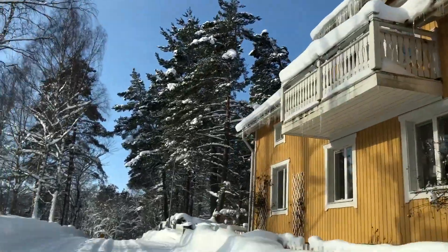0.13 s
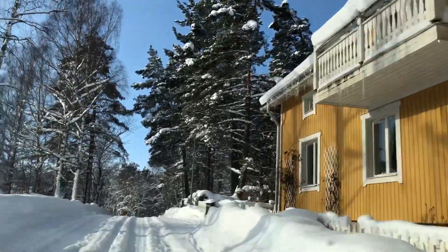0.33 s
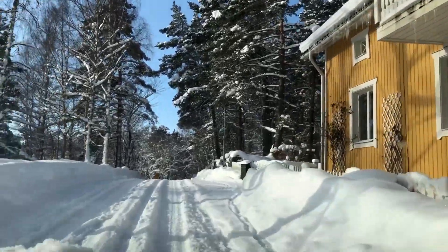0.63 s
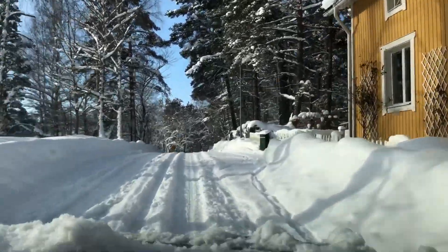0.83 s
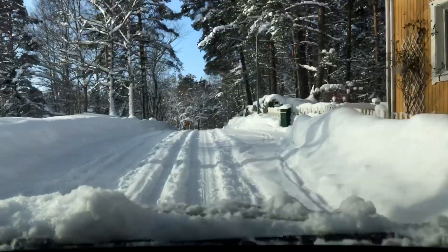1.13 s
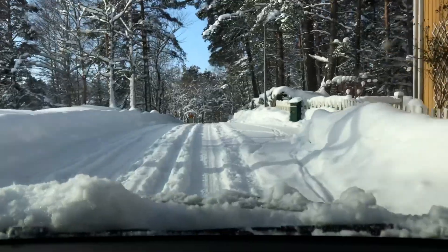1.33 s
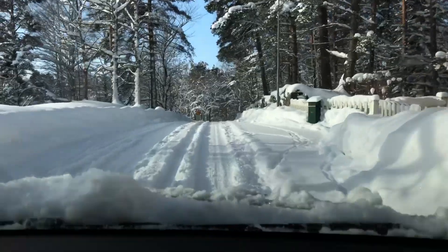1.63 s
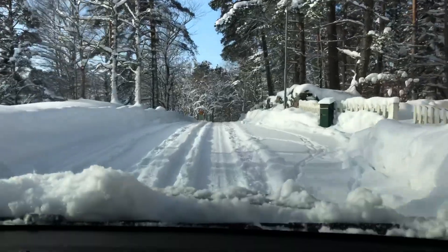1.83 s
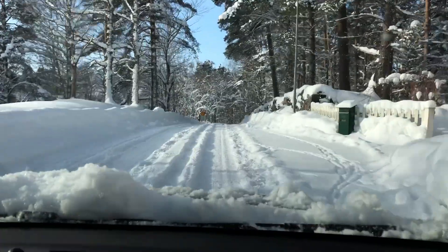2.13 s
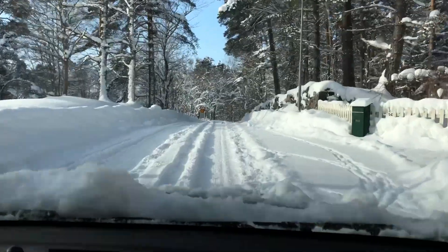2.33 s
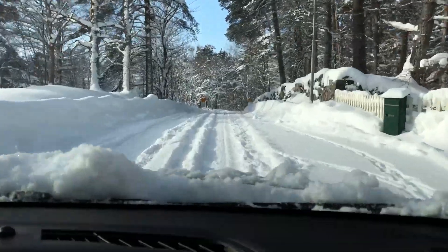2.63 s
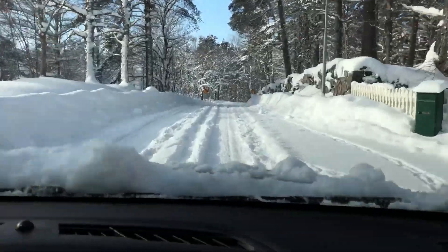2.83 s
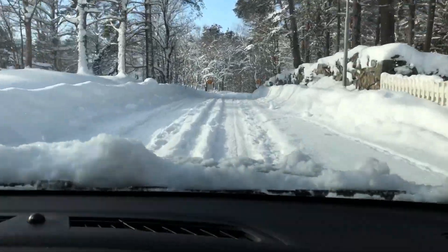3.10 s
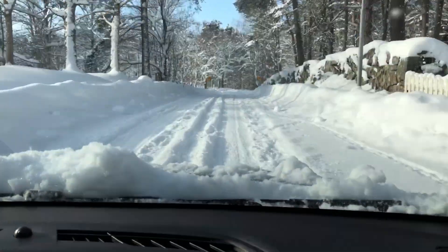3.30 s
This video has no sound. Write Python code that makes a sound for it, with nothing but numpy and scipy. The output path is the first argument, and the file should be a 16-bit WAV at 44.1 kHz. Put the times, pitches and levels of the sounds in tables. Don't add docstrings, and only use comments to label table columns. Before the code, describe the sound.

Inside a closed car cabin, a low engine hum with light knocking slows, holds and slightly picks up, over steady rumble; a close coat swish comes early, a metallic clink and faint squeaks late.

```python
import sys
import numpy as np
from scipy import signal
from scipy.io import wavfile
from scipy.ndimage import uniform_filter1d

SR = 44100
rng = np.random.default_rng(int(sys.argv[2]) if len(sys.argv) > 2 else 0)


def digitize_waveform(pressure):
    field = np.atleast_2d(pressure).T
    bounded = np.clip(field, -1, 1)
    quanta = np.round(bounded * 32767).astype(np.int16)
    wavfile.write(sys.argv[1], SR, quanta)


def voltage_ratio(decibels):
    exponent = np.asarray(decibels, float) / 20
    return 10 ** exponent


N = 152586
T = np.arange(N) / SR


def evened(x):
    return x / np.sqrt(np.mean(x ** 2) + 1e-20)


def resonate(x, hz, width):
    r = np.exp(-np.pi * width / SR)
    pole = r * np.exp(2j * np.pi * hz / SR)
    return 2 * signal.lfilter([1 - r], [1, -pole], x.astype(complex)).real


def drift(top_hz):
    t = T[::32]
    wander = np.zeros(len(t))
    for hz in np.geomspace(top_hz / 20, top_hz, num=20):
        wander += np.sin(2 * np.pi * (hz * t + rng.random())) / np.sqrt(hz)
    return evened(np.interp(T, t, wander))


def noise(points, patchy_db, size):
    hz = np.fft.rfftfreq(size, 1 / SR)
    f, db = np.transpose(points)
    real, imaginary, patches = rng.standard_normal((4 * N // size + 6, len(hz), 3)).T
    patches = uniform_filter1d(patches, size=5, axis=0)
    patches = evened(uniform_filter1d(patches, size=6, axis=1))
    octave = np.log2(hz + 1)
    colour = np.interp(octave, np.log2(f), db)
    colour -= 12 * np.maximum(np.log2(f[0]) - octave, 0)
    colour -= 24 * np.maximum(octave - np.log2(f[-1]), 0)
    spectra = (real + 1j * imaginary) * voltage_ratio(colour[:, None] + patchy_db * patches)
    return evened(signal.istft(spectra, nperseg=size, noverlap=3 * size // 4)[1][:N])


# time in seconds, rate in four-stroke cycles per second (four firings a cycle).
CYCLE_RATE = [
    (0.0, 15.119),
    (0.5, 15.495),
    (0.75, 14.818),
    (1.05, 13.974),
    (1.45, 13.463),
    (2.0, 13.443),
    (2.6, 13.471),
    (3.0, 14.003),
    (3.46, 14.168),
]


def crank():
    slow, fast = 13.5, 15.3
    speed = np.interp(T, *np.transpose(CYCLE_RATE))
    return np.cumsum(speed) / SR, np.clip((speed - slow) / (fast - slow), 0, 1)


# multiple of the cycle rate, level in dB when slow, level in dB when fast,
# lead in turns when slow, lead in turns when fast, wobble in dB.
ORDERS = [(4, -34, -33.5, 0, -.42, 1.5), (8, -35, -48, .24, .2, 1), (12, -60, -44.5, .15, .1, 2),
          (3, -46, -60, .62, .1, 2), (10, -50, -50, .1, .3, 3), (13, -51, -52, .4, .3, 2),
          (16, -51, -57.5, .24, .11, 3), (36, -50.5, -64, .7, .67, 1.6), (48, -64, -60.5, .35, .2, 3.5),
          (32, -55, -56, .64, .56, 2.5)]
# time in seconds, extra firing boom in dB.
LOAD_BUMPS = [(0, -13), (.2, 1.5), (.4, 0.5), (.6, -3), (.85, 4), (1.2, -1), (1.4, 2.5), (1.6, 3),
              (1.85, 0.5), (2.0, 3), (2.15, 0), (2.3, -3.5), (2.7, -1.5), (2.88, -4.5), (3.05, 6.5),
              (3.25, -6), (3.46, 7)]


def engine_boom():
    cycle, fast = crank()
    load_db = np.interp(T, *np.transpose(LOAD_BUMPS))
    out = np.zeros(N)
    for order, slow_db, fast_db, slow_lead, fast_lead, wobble_db in ORDERS:
        level_db = slow_db + (fast_db - slow_db) * fast + wobble_db * drift(5.92)
        if order == 4:
            level_db = level_db + load_db
        turns = order * cycle + slow_lead + (fast_lead - slow_lead) * fast
        out += np.sqrt(2) * voltage_ratio(level_db) * np.cos(2 * np.pi * turns)
    return out


# frequency in Hz, width in Hz, level in dB when slow,
# level in dB when fast, lead in seconds.
BLOCK_MODES = [(2152, 62, -52.7, -48.7, .0055), (2118, 40, -62, -58, .0048), (2250, 80, -67, -62, .001),
               (2870, 150, -67.5, -59.5, .009), (1630, 110, -65, -64, .005), (486, 30, -55, -55, -.004)]
# first, second, third and fourth cylinder in dB.
CYLINDER_DB = [(0, -20, -9.5, -13), (0, -20, -9.5, -13), (0, -10, -8, -8), (0, -14, -3, -7),
               (-1.5, -2.5, 0, -1.5), (-6, 0, -5, -3)]
# time in seconds, then first to fourth cylinder in dB.
KNOCK_SHIFT = [(0, -1.5, 2, 0, -2), (.4, 2, 13, 3.5, 7.5), (.7, -0.5, 9, 1.5, 4.5), (1.4, 3.5, 6, 1, 8),
               (1.8, 2, -2, 3, -7), (2.4, 1, 6, -5.5, 1), (2.7, -1, 3, 3, 0), (2.85, -0.5, 13, 5, 5),
               (3.05, -1, -5, 5.5, -4), (3.46, 1, 4, 0.5, 4)]


def engine_knock():
    burst_s, spread_db, rattle_spread_db, rough_share, sag_db_per_s = .002, .7, 1.5, .05, -.7
    cycle, fast = crank()
    at = np.searchsorted(4 * cycle, np.arange(int(4 * cycle[-1]) + 1))
    count = len(at)
    strength_chance, time_chance = rng.standard_normal((2, count))
    shift_s, *shifts = np.transpose(KNOCK_SHIFT)
    shift_db = np.array([np.interp(T[at[k]], shift_s, shifts[k % len(shifts)]) for k in range(count)])
    t = np.arange(int(5 * burst_s * SR)) / SR
    burst = t / burst_s * np.exp(-t / burst_s)
    out = np.zeros(N)
    for (hz, width, slow_db, fast_db, lead), pattern in zip(BLOCK_MODES, CYLINDER_DB):
        if abs(hz - BLOCK_MODES[0][0]) < width:
            extra_db = shift_db
        else:
            extra_db = rattle_spread_db * rng.standard_normal(count)
        jitter = (time_chance * 15).astype(int)
        place = np.clip(at - round(lead * SR) + jitter, 0, N - 1)
        hits = np.zeros(N)
        hits[place] = voltage_ratio(np.resize(pattern, count) + spread_db * strength_chance + extra_db)
        tone_bursts = signal.oaconvolve(hits, burst * np.cos(2 * np.pi * hz * t))[:N]
        noise_bursts = signal.oaconvolve(hits, burst)[:N] * rng.standard_normal(N)
        clean = resonate(tone_bursts, hz, width)
        rough = resonate(resonate(noise_bursts, hz, width), hz, 4 * width)
        ring = (1 - rough_share) * evened(clean) + rough_share * evened(rough)
        level_db = slow_db + (fast_db - slow_db) * fast + sag_db_per_s * (T + 1.5)
        out += voltage_ratio(level_db) * evened(ring)
    return out


# frequency in Hz, level in dB per Hz.
FLOOR_COLOUR = [(20, -48), (30, -21), (42, 3.5), (56, -5.5), (72, 0), (140, -1), (200, -8), (300, -16)]


def road_rumble():
    return voltage_ratio(-32.5 + .5 * drift(3.24)) * noise(FLOOR_COLOUR, patchy_db=1.33, size=4096)


# frequency in Hz, level in dB per Hz.
ROAR_COLOUR = [(200, -1), (400, -3.5), (700, -8.5), (1000, -17), (1700, -19), (2050, -23.5), (3500, -30),
               (7000, -44.5)]


def fan_and_tyre_roar():
    return voltage_ratio(-40.5 + .3 * drift(3.0)) * noise(ROAR_COLOUR, patchy_db=.9, size=1024)


# frequency in Hz, width in Hz, level in dB when slow, level in dB when fast.
PANEL_MODES = [(490, 22, -55, -55), (644, 30, -56, -55), (718, 30, -56, -56), (180, 16, -48, -42),
               (150, 14, -46, -41), (136, 22, -43, -43), (216, 14, -48, -50), (4300, 150, -76, -76),
               (2150, 70, -67, -63)]


def panel_hum():
    fast = crank()[1]
    out = np.zeros(N)
    for hz, width, slow_db, fast_db in PANEL_MODES:
        hum = resonate(resonate(rng.standard_normal(N), hz, width), hz, 2 * width)
        out += voltage_ratio(slow_db + (fast_db - slow_db) * fast) * evened(hum)
    return out


# frequency in Hz, level in dB per Hz.
CLOTH_COLOUR = [(2000, -6), (5000, 0), (9000, -1.5), (13000, -1), (15000, 2.5), (15750, 5)]
# peak in seconds, rise in seconds, fall in seconds, level in dB.
STROKES = [(.0, .05, .14, -62), (.6, .2, .2, -67.5), (.94, .08, .075, -54.5), (.83, .06, .05, -63),
           (1.08, .07, .17, -61.5), (1.34, .05, .05, -63), (1.52, .05, .07, -67), (1.78, .04, .04, -72),
           (2.97, .04, .15, -67.5), (3.13, .06, .06, -73), (3.3, .06, .13, -63.5), (2.0, 1.2, 1.5, -72)]


def coat():
    power = np.zeros(N)
    for peak, rise, fall, db in STROKES:
        power += voltage_ratio(2 * db) * np.exp(-((T - peak) / np.where(T < peak, rise, fall)) ** 2)
    return np.sqrt(power) * voltage_ratio(.5 * drift(60.)) * noise(CLOTH_COLOUR, patchy_db=1.2, size=256)


# frequency in Hz, level in dB per Hz.
HISS_COLOUR = [(2000, 0), (4000, 0), (6000, -5), (10000, -3.5), (13500, -3), (15200, 0), (15750, 4)]


def microphone_hiss():
    return voltage_ratio(-71.8 + .5 * drift(1.7)) * noise(HISS_COLOUR, patchy_db=1.5, size=512)


# start in seconds, frequency in Hz, width in Hz, level in dB.
TRIM_TICKS = [
    (2.927, 5200, 50, -54),
    (2.54, 4000, 120, -57),
    (3.128, 5500, 1500, -53),
    (3.39, 11400, 150, -58),
    (2.975, 13000, 80, -68),
    (3.342, 6300, 200, -62),
]


def trim_ticks():
    out = np.zeros(N)
    for start, hz, width, db in TRIM_TICKS:
        t = np.maximum(T - start, 0)
        envelope = np.minimum(t / 0.00087, 1) * np.exp(-np.pi * width * t)
        out += voltage_ratio(db) * envelope * np.sin(2 * np.pi * hz * t)
    return out


# frequency in Hz, width in Hz, level in dB, lateness in seconds.
METAL_MODES = [(1800, 300, -15, .002), (2300, 90, -14, .003), (2700, 300, -13, -.002),
               (3200, 300, -15, .016), (3600, 300, -15, .004), (4300, 300, -3.5, 0), (4850, 120, -13, .012),
               (5280, 60, -8, 0), (5790, 60, -6, 0), (6160, 90, 0, 0), (6900, 130, -1, .0005),
               (7280, 70, 0, .001), (8120, 150, -7, -.004), (8000, 300, -9, .006), (11200, 400, -8, .014),
               (11900, 300, -10, -.003), (13300, 300, -11, .014), (15500, 300, -11, .001)]
# frequency in Hz, level in dB per Hz.
GRIT_COLOUR = [(1500, -2), (3000, -3), (5000, 1.5), (8500, 0), (10000, -5), (12000, 1.5), (14000, -10),
               (15750, 2)]


def clink():
    start_s, length_s, rise_s, fall_s, wash_fall_s = 2.6555, .045, .008, .005, .016
    modes_db, wash_db, fuzz_share = -35, -39, .45
    t = np.arange(round(length_s * SR)) / SR
    wash = np.exp(-(t / wash_fall_s) ** 1.2 / 2) * np.minimum(2 * t / rise_s, 1)
    shake = voltage_ratio(wash_db) * wash * noise(GRIT_COLOUR, patchy_db=-0.5, size=256)[:len(t)]
    for hz, width, db, late in METAL_MODES:
        u = t - late - rise_s
        swell = np.where(u < 0, np.exp(-(u / rise_s) ** 2 * 2), np.exp(-u / fall_s))
        tone = np.sqrt(2) * np.cos(2 * np.pi * hz * (t - rise_s))
        fuzz = evened(resonate(rng.standard_normal(len(t)), hz, 2 * width))
        shake += voltage_ratio(modes_db + db) * swell * ((1 - fuzz_share) * tone + fuzz_share * fuzz)
    fades = np.clip((length_s - t) / .02, 0, 1) * np.minimum(t / .004, 1)
    out, start = np.zeros(N), round(start_s * SR)
    out[start:start + len(t)] = shake * fades
    return out


# frequency in Hz, width in Hz, level in dB, start in seconds, length in seconds.
TRIM_SQUEAKS = [
    (7900, 220, -71.5, 3.21, .22),
    (9900, 600, -70, 3.26, .075),
    (9800, 500, -69, 3.305, .03),
    (11300, 220, -69, 3.24, .095),
    (11300, 150, -74, 3.33, .1),
    (4200, 200, -66, 3.2, .26),
    (4100, 150, -70, 2.92, .2),
    (13000, 200, -73, 2.94, .07),
]


def trim_squeak():
    out = np.zeros(N)
    for hz, width, db, start, length in TRIM_SQUEAKS:
        swell = np.sqrt(np.sin(np.pi * np.clip((T - start) / length, 0, 1)) + 1e-9)
        out += voltage_ratio(db + 2.2 * drift(60.)) * swell * evened(resonate(rng.standard_normal(N), hz, width))
    return out


def scene():
    engine = engine_boom() + engine_knock()
    road = road_rumble() + fan_and_tyre_roar() + panel_hum()
    small_parts = trim_ticks() + clink() + trim_squeak()
    return (engine + road + coat() + small_parts)[None]


def top_cut(x):
    return signal.sosfilt(signal.butter(12, 16550, fs=SR, output="sos"), x)


def record(dry):
    heard = dry + microphone_hiss()
    low_pass = signal.firwin(4095, 15760, window=("kaiser", 9), fs=SR)
    heard = signal.oaconvolve(heard, low_pass[None], "same")
    return top_cut(heard)


dry = scene()
out = record(dry)
digitize_waveform(out)
```